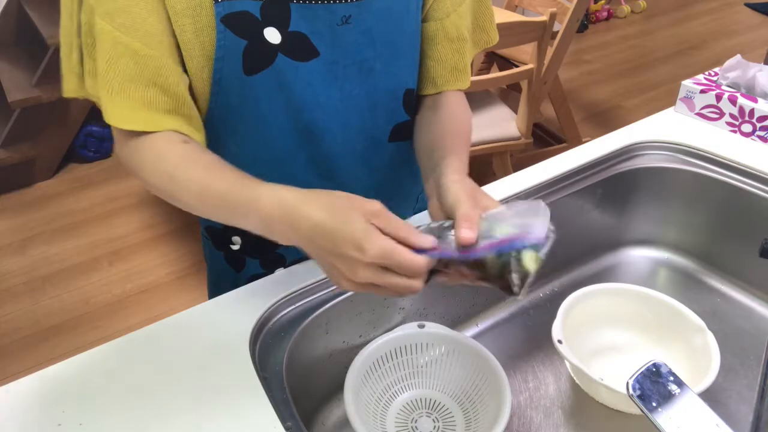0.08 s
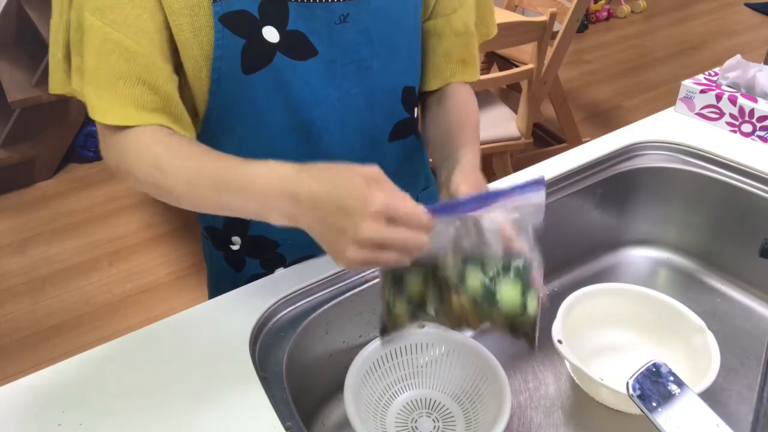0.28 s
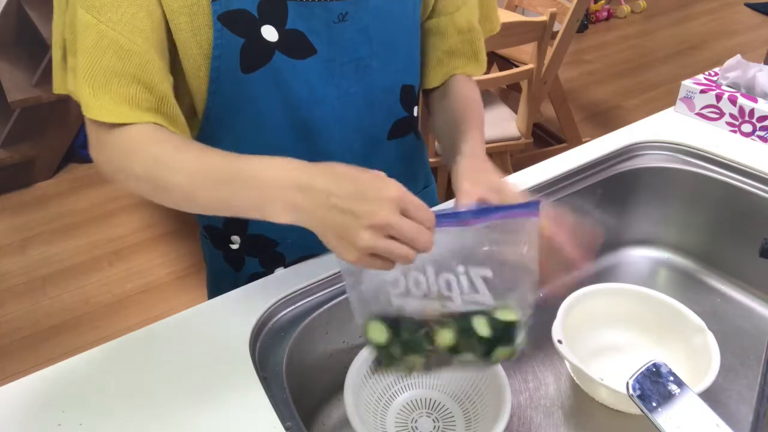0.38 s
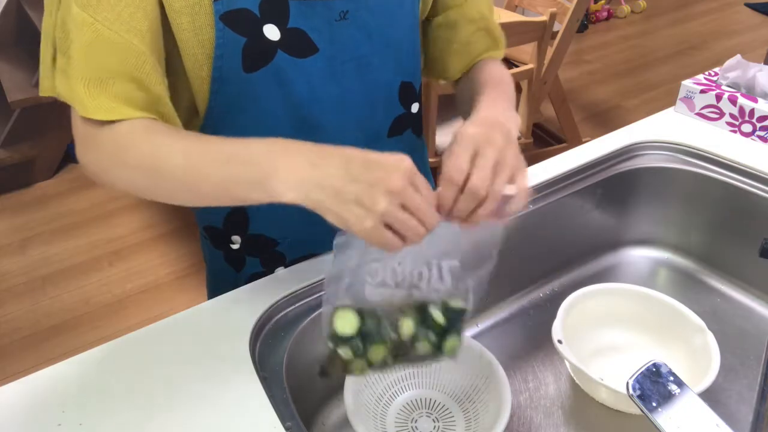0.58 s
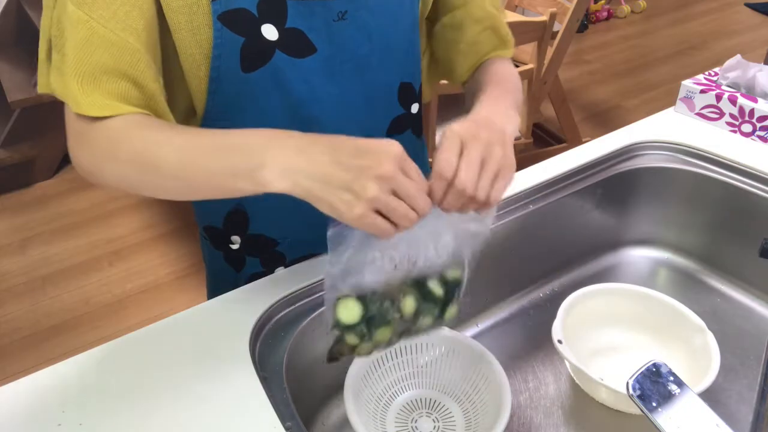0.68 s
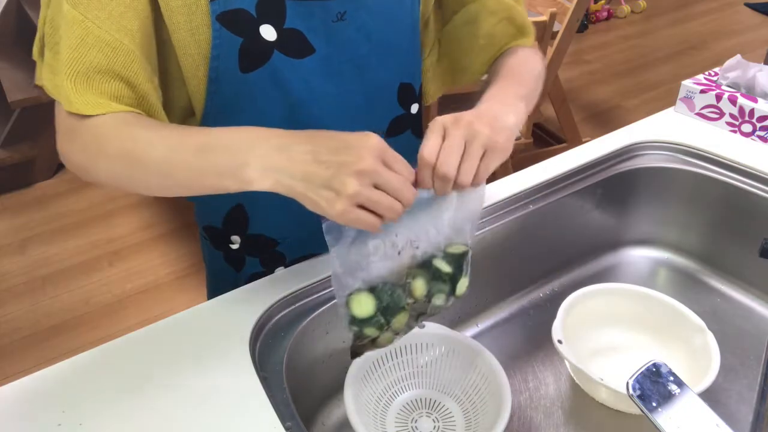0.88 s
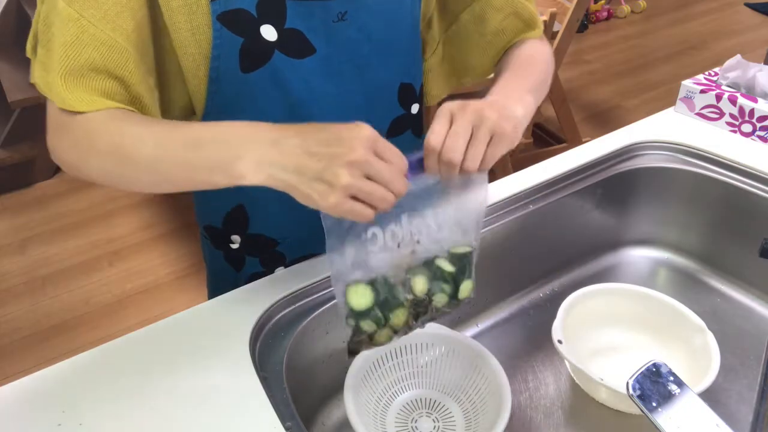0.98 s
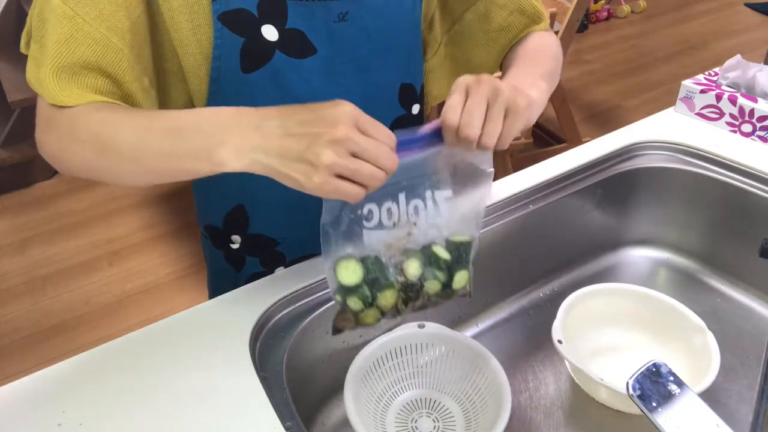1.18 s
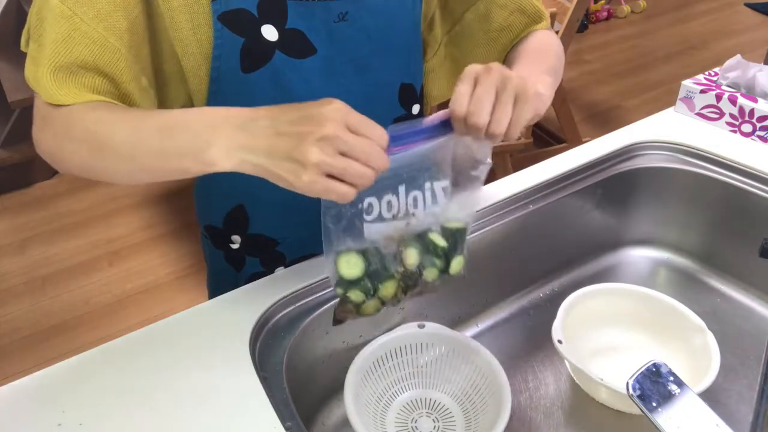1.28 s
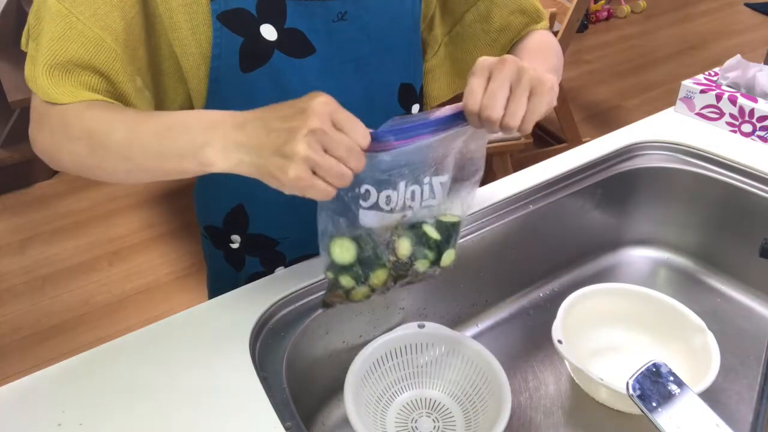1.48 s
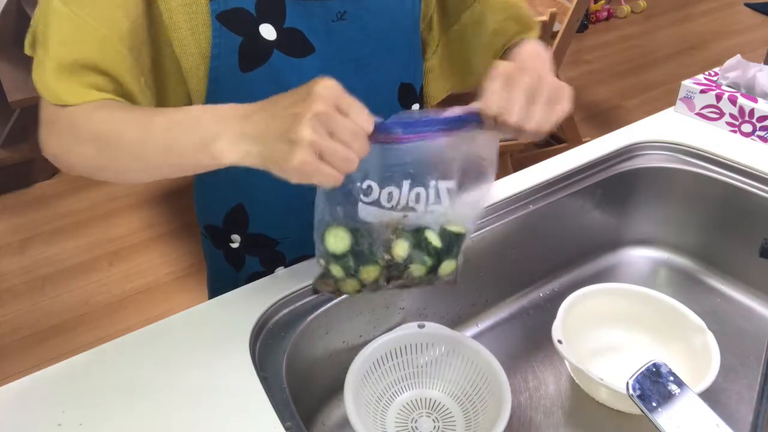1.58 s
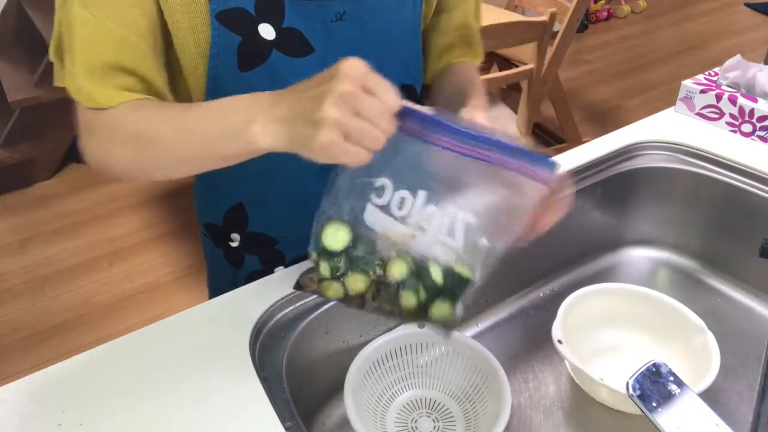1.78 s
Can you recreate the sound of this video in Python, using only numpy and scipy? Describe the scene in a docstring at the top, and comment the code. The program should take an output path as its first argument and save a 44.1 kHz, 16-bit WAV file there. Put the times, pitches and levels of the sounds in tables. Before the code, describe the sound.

A plastic zipper bag of wet cut vegetables crackles in a burst of sharp irregular snaps, peaking early, then only faint ticks and soft rustles; close microphone, small hard kitchen, quiet low hum.

```python
"""Creases snap in a plastic zipper bag that hands shake and pinch above a kitchen sink: each snap is
a decaying noise burst exciting a film band, the bag's resonances and a bright sheen. Crinkles are random
grains under a grip curve, the sliding seal a drifting narrow-band hiss, the wet contents damped low
sines. A small hard room adds a decaying noise tail to the film sounds, over a quiet hum of shaped noise."""
import sys
import numpy as np
from scipy import signal
from scipy.fft import rfft, irfft
from scipy.io import wavfile
from scipy.ndimage import uniform_filter1d

SR = 44100
rng = np.random.default_rng(int(sys.argv[2]) if len(sys.argv) > 2 else 0)


def wav_out(sig):
    """Save sig, one row per channel (or a flat mono array), as 16-bit PCM at SR to the path in sys.argv[1]."""
    wavfile.write(sys.argv[1], SR, np.round(np.clip(np.atleast_2d(sig).T, -1, 1) * 32767).astype(np.int16))


N = 79380  # samples, 1.8 s


def undb(db):
    """Level to amplitude: 20 dB is a factor of ten."""
    return 10 ** (np.asarray(db) / 20)


def unit(x):
    """Normalisation to an rms amplitude of one."""
    return x / np.sqrt(np.mean(x ** 2))


def peak(x):
    """Normalisation to a peak amplitude of one."""
    return x / np.abs(x).max()


def band(x, hz, octaves):
    """Causal band-pass filtering, with edges placed evenly in octaves about the centre."""
    edges = hz * 2 ** (np.array([-.5, .5]) * octaves)
    edges = np.clip(edges, 20, .45 * SR)
    return signal.sosfilt(signal.butter(2, edges, "band", fs=SR, output="sos"), x)


def colour(x, table):
    """Spectral shaping: levels are interpolated over log frequency, then the rms is set to one."""
    hz, db = np.array(table).T
    f = np.arange(len(x) // 2 + 1) * SR / len(x) + 1  # +1 Hz keeps the logarithm finite
    gain = undb(np.interp(np.log(f), np.log(hz), db))
    return unit(irfft(rfft(x) * gain, len(x)))


def add(out, s, x):
    """Superposition: sounds sum where they overlap."""
    i = int(s * SR)
    out[i:i + len(x)] += x[:len(out) - i]


def swell(t, rise_ms, decay_ms):
    """Exponential build-up and decay, each with its own time constant."""
    return (1 - np.exp(-t * 1000 / rise_ms)) * np.exp(-t * 1000 / decay_ms)


# Snaps of the film: (time [s], ring peak level [dB], ring centre [Hz], body peak re ring [dB],
# sheen peak re ring [dB], burst decay time constant [ms], ring width [octaves])
FILM_SNAPS = [(.055,-34,3980,-15,-12,2.8,1.2),(0.064,-33,1260,-14,-4,3.7,0.85),(0.0869,-30,3500,-10,-8,4.4,1.3),(0.1026,-20,1600,-36,-26,0.84,1.05),(.1101,-29,6000,-17,-9,3.5,1.7),(0.126,-27,1290,-18,-24,0.92,1.1),(0.13,-30,2000,-2.5,-22,2.4,1.8),
              (.1781,-16,2280,-9.5,-13,2.7,1.3),(.179,-24.5,5200,-18,-14,2.7,1.1),(0.2112,-25.5,3330,-10,-5,3.2,1.5),(0.2275,-9,4450,-19.5,-6.5,2.6,1.5),(.2399,-11.5,3540,-11.5,-22,2.5,1.5),(0.2455,-10,2780,-19,-9,1.66,1.4),(0.2521,-10,4900,-13,-3.5,1.9,0.96),(.2704,-21.5,1560,-11,-16,1,0.67),
              (.3018,-10.5,3900,-22,-6,5.7,1),(0.3091,-20,3500,-14,-12,1.2,1.5),(0.3068,-23,2530,-9,-18,0.77,0.81),(0.3149,-11.5,3000,-5,-8,1.6,1.8),(0.3197,1,3380,-24,-30,1,1.63),(0.3264,-8.5,2190,-11.5,-20,3,0.8),(0.3327,-15,2020,-4,-14,1.46,0.69),(0.3459,-10,2860,-15,-0.5,2.1,1.8),(0.3774,-21,2770,-25,-14,2,3.5),(0.384,-21,4420,-16,-5,1,1.7),(0.3933,-10.5,2930,-8,-7,0.85,3.34),
              (0.4668,-21,2530,-4,-35,4.8,1.44),(0.5515,-30.5,3920,-7,-12,4.5,2.3),(0.5605,-28,3060,-15,-14,1.1,3.6),(0.5981,-25,604,-7,-28,4.9,1.3),(0.647,-32,3240,-11,-1.5,8.4,0.51),(.6478,-28.5,6350,-13,-8,3.3,0.61),(0.7336,-41,2190,-1.5,-18,3.8,1),(0.77,-45,2060,-1.5,-24,2.3,0.64),
              (0.864,-42.5,3150,-10,-1,5,0.79),(0.904,-42,2160,2.5,4,3.1,1.1),(0.9573,-24,6600,-17.5,4,5.5,1.4),(1.1524,-37.5,1930,-4,-21,1.4,0.55),(1.1781,-37.5,2930,-6.5,-4,6.2,1.6),(1.2474,-44,2300,3,-21,1.1,0.59),
              (1.3065,-40,2150,-5,-24,2.5,0.56),(1.3149,-33.5,2980,-2,-23,2.2,1.04),(1.33,-56,4300,2,-23,2.4,.8),(1.3458,-32,3800,1,-11,3.5,0.96),(1.3567,-37.5,1740,-3,-22,9.1,0.43),(1.4161,-37,2060,3.5,-26,3.7,0.66),(1.428,-38.5,6200,-3.5,-13.5,5.9,1.1),
              (1.4526,-32.5,2960,-19,-28,2,1.25),(1.4711,-40,2270,0,-30,3.2,0.99),(1.482,-36.5,1690,-5.5,-31,1.6,0.61),(1.5491,-29,2900,-4.5,-8,2.1,1.6),(1.5529,-28,3810,-15,-20,5.1,0.27),(1.5746,-36.5,4100,1,-26,8.7,0.22),(1.5813,-32,1420,-17,-25,4.9,1.14),
              (1.6032,-38,1520,3.5,-6,4.3,1.3),(1.6376,-42.5,8000,7.5,0,4.8,1),(1.6541,-27,1900,-8.5,-18,1.5,1.27),(1.6844,-38.5,5000,-6,1,2.1,2.9),(1.7055,-32,2580,-3,-12,2.1,2.1),(1.7234,-42.5,8000,-13,4,2.2,1.3)]
RISE_MS = 0.29  # time constant
CRACK = 3.61  # impulse amplitude, re the unit-rms noise before its envelope
SHEEN_HZ, SHEEN_OCT = 11520, 1.25


def snaps():
    """Impulsive excitation: each crease gives way in a burst that drives ring, body and sheen."""
    out, t = np.zeros(N), np.arange(4096) / SR
    for s, db, hz, body_db, sheen_db, ms, octaves in FILM_SNAPS:
        burst = rng.standard_normal(len(t)) * swell(t, RISE_MS, ms)
        burst[8] += CRACK  # a single-sample crack 0.2 ms into the burst
        ring = peak(band(burst, hz, octaves))
        body = undb(body_db) * peak(pouch(burst))
        sheen = undb(sheen_db) * peak(band(burst, SHEEN_HZ, SHEEN_OCT))
        add(out, s, undb(db) * (ring + body + sheen))
    return out


# Air and load in the bag: (resonance [Hz], nominal width [octaves], relative level [dB])
BAG_MODES = [(140.6, 0.61, -2), (253.5, 0.17, 2), (348, 0.33, -5.5), (663, 0.19, -7), (493, 1.82, 4)]


def pouch(x):
    """Modal resonance: the bag's low modes ring in parallel, the widest as a broad dry knock."""
    modes = np.zeros(len(x))
    for hz, octaves, db in BAG_MODES:
        b, a = signal.iirpeak(hz, 1.56 / octaves, SR)
        # dividing by root bandwidth evens the modes' response to noise
        modes += undb(db) * signal.lfilter(b, a, x) / np.sqrt(hz * octaves)
    return band(modes, 413, 3.57)


# Grip on the film: (time [s], crinkle level [dB], sheen level [dB], body level [dB])
GRIP_LEVELS = [(0, -50.5, -58, -50), (.05, -45, -56.5, -57), (.11, -44, -54, -48.5), (.14, -50, -63, -59),
               (.17, -53, -64, -54), (.19, -55, -52, -43), (.225, -38, -66, -59), (0.24, -39, -29, -29.5),
               (.262, -32, -39, -38), (0.29, -34.5, -55, -44), (.304, -24.5, -33, -31.5),
               (.32, -14, -33, -30), (0.333, -32.5, -37, -24), (0.361, -44, -63, -55),
               (.385, -36.5, -51, -45), (0.396, -27, -42, -36), (0.429, -46, -67, -56),
               (.48, -45.5, -58, -51), (.52, -53.5, -78, -77), (0.547, -52.5, -74, -56),
               (0.558, -38.5, -62, -41.5), (.585, -54, -54.5, -53), (.64, -55.5, -65, -49.5),
               (.67, -51.5, -71, -52), (0.719, -62.5, -76, -59.5), (.84, -56.5, -67, -60.5),
               (.9, -53.5, -62.5, -62.5), (1.05, -53, -62, -63.5), (1.2, -56.5, -67, -57),
               (1.29, -64, -68, -64.5), (1.336, -49, -64, -48), (1.37, -54, -61, -49),
               (1.41, -59.5, -72, -57.5), (1.48, -65, -72, -50), (1.536, -71, -75, -55),
               (1.565, -55, -80, -57), (1.6, -57, -61, -48.5), (1.64, -53.5, -58, -63),
               (1.68, -79, -66, -49.5), (1.74, -75, -81, -68), (1.8, -84, -72, -57)]
# Spectrum of the crinkling film: (frequency [Hz], relative spectral level [dB])
FILM_SPECTRUM = [(470, -3), (800, -26), (1430, 7), (1570, 1), (1900, 5), (3230, -1.5), (4280, 0),
                 (6730, -4.5), (8000, -9.5), (10400, -26), (17600, -120)]
CRINKLES_PER_S, CRINKLE_MS = 2700, 1  # mean rate, decay time constant
CRINKLE_SCATTER_DB, CRINKLE_TOP_DB = 5.5, 11  # mean of the exponential draw, cap on each draw


def crinkle():
    """Random impulse process: tiny creases of uneven size, their level following the grip."""
    t = np.arange(N) / SR
    times, film_db, sheen_db, body_db = np.array(GRIP_LEVELS).T
    size_db = np.minimum(CRINKLE_SCATTER_DB * rng.exponential(size=N), CRINKLE_TOP_DB)
    hits = (rng.random(N) < CRINKLES_PER_S / SR) * undb(size_db)
    decay = np.exp(-1000 / (CRINKLE_MS * SR))  # amplitude kept per sample
    grains = signal.lfilter([1], [1, -decay], hits) * rng.standard_normal(N)
    film = colour(grains, FILM_SPECTRUM) * undb(np.interp(t, times, film_db))
    sheen = unit(band(grains, SHEEN_HZ, SHEEN_OCT)) * undb(np.interp(t, times, sheen_db))
    body = unit(pouch(grains)) * undb(np.interp(t, times, body_db))
    return film + sheen + body


# Fingers slide along the seal: (time [s], hiss level [dB], hiss centre [Hz])
SEAL_SLIDE = [(.7, -75, 4500), (.8, -79, 4950), (.9, -62.5, 6280), (1.05, -63.5, 5500), (1.15, -73, 5940),
              (1.27, -69, 6780), (1.33, -84, 6800)]
SLIDE_WIDTH_HZ = 380  # sets the averaging length of the slow noise


def slide():
    """Amplitude modulation: slow noise on a gliding sine gives a narrow hiss that drifts in pitch."""
    t = np.arange(N) / SR
    times, db, hz = np.array(SEAL_SLIDE).T
    slow = uniform_filter1d(rng.standard_normal(N), int(SR / SLIDE_WIDTH_HZ))
    phase = 2 * np.pi * np.cumsum(np.interp(t, times, hz)) / SR
    return unit(slow * np.sin(phase)) * undb(np.interp(t, times, db))


# Thuds of the contents: (time [s], envelope peak level [dB], pitch [Hz], decay time constant [ms])
LOAD_THUDS = [(0.068, -50, 102, 14), (0.177, -46, 94.2, 12), (0.242, -49, 140, 11), (0.301, -26, 97, 13),
              (0.319, -18.5, 64, 8.8), (0.387, -43, 151, 8.7), (0.427, -45, 72.7, 18),
              (0.468, -50, 69.4, 16), (0.565, -33.5, 68, 21), (0.593, -30.5, 74, 14), (0.648, -42, 72, 21),
              (0.698, -39, 86, 21), (0.749, -39, 89, 19), (0.8, -48.5, 91.5, 16), (0.857, -46, 61.9, 14),
              (0.94, -50, 98, 10), (1.057, -55, 61.6, 16), (1.095, -40.5, 92, 18), (1.138, -44, 84.6, 35),
              (1.21, -49, 72, 12), (1.315, -37.5, 84, 30), (1.344, -44.5, 102, 18), (1.39, -44, 88.8, 16),
              (1.47, -42, 82, 18), (1.58, -45, 93, 23), (1.634, -38, 98, 16), (1.674, -41, 91.5, 11),
              (1.698, -42, 67.3, 9.2), (1.779, -52, 72.7, 16)]
THUD_RISE_MS = 2  # time constant


def thuds():
    """Damped oscillation: the soft load swings against the bag for a few low cycles."""
    out, t = np.zeros(N), np.arange(8192) / SR
    for s, db, hz, ms in LOAD_THUDS:
        envelope = peak(swell(t, THUD_RISE_MS, ms))
        add(out, s, undb(db) * envelope * np.sin(2 * np.pi * hz * t))
    return out


ROOM_T60_S, ROOM_TREBLE_T60_S = 0.27, 0.2  # times to fall 60 dB
ROOM_DB, ROOM_GAP_MS = -6, 1  # tail energy re direct sound, build-up time constant


def room(x):
    """Reverberation by convolution: dense echoes off tiles and steel, whose treble dies first."""
    t, n = np.arange(SR // 2) / SR, rng.standard_normal(SR // 2)
    low = band(n, 390, 7.2)
    treble = n - low
    tail = low * undb(-60 * t / ROOM_T60_S) + treble * undb(-60 * t / ROOM_TREBLE_T60_S)
    tail = tail * (1 - np.exp(-t * 1000 / ROOM_GAP_MS))
    tail = tail / np.sqrt(np.sum(tail ** 2))  # unit energy
    return signal.fftconvolve(x, tail)[:N] * undb(ROOM_DB)


# Spectrum of the hum: (frequency [Hz], relative spectral level [dB])
HUM_SPECTRUM = [(18, -57), (30, 1.5), (121, 0.5), (227, -5), (384, -6.5), (1250, -16.5), (1590, -22.5),
                (2350, -11), (3220, -23.5), (3870, -17.5), (16000, -31.5)]
HUM_DB = -52  # rms level


def hum():
    """Stationary random noise, spectrally shaped and held at a steady level."""
    return colour(rng.standard_normal(N), HUM_SPECTRUM) * undb(HUM_DB)


def scene():
    """Linear superposition: film sounds, direct and reverberant, with the direct thuds and hum."""
    film = snaps() + crinkle() + slide()
    return (film + room(film) + thuds() + hum())[None]


MIC_LOW_HZ, TOP_HZ = 45, 15900  # lower and upper cutoffs
MIC_DIP_HZ, MIC_DIP_OCT, MIC_DIP = 10320, 0.11, 0.41  # centre, width, fraction of the band removed


def record(dry):
    """Band limiting and saturation: the microphone cuts bass and dips; the recorder rounds peaks and cuts the top."""
    x = signal.sosfilt(signal.butter(3, MIC_LOW_HZ, "high", fs=SR, output="sos"), dry)
    x = x - MIC_DIP * band(x, MIC_DIP_HZ, MIC_DIP_OCT)
    x = x / (1 + x ** 4) ** .25  # near-linear when quiet, bounded at one
    return .97 * signal.sosfilt(signal.ellip(10, .2, 60, TOP_HZ, fs=SR, output="sos"), x)


dry = scene()
out = record(dry)
wav_out(out)
```